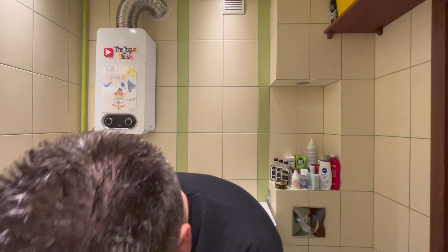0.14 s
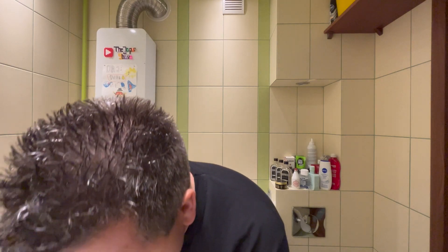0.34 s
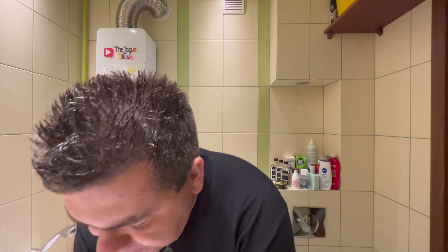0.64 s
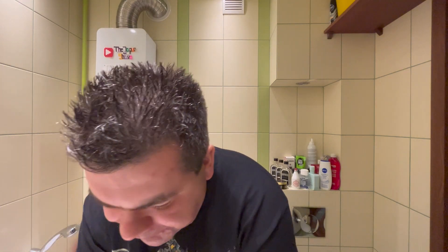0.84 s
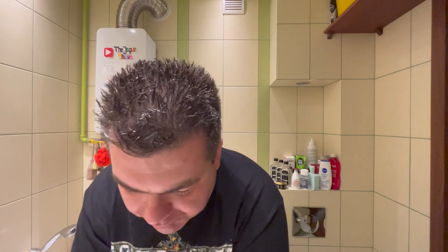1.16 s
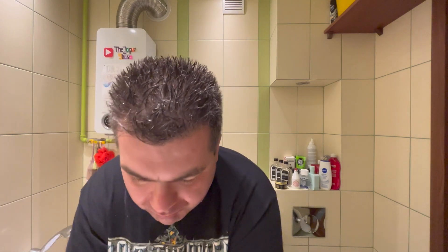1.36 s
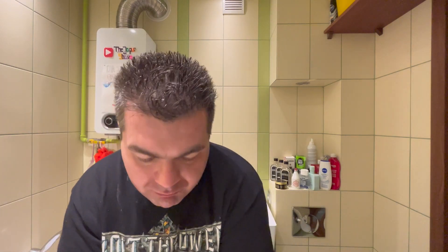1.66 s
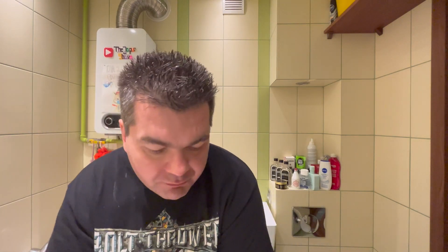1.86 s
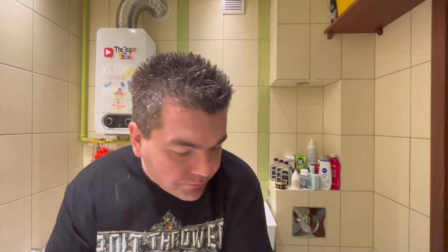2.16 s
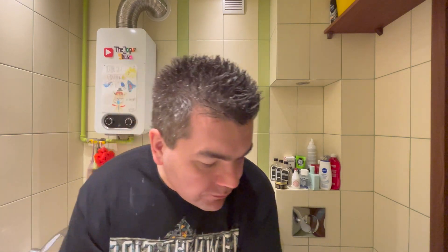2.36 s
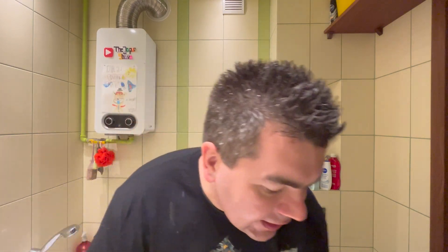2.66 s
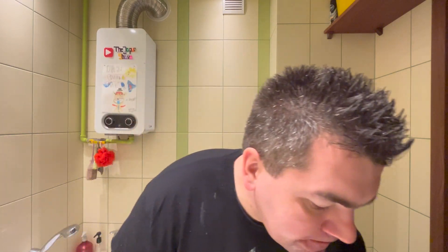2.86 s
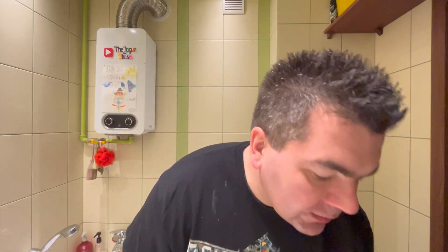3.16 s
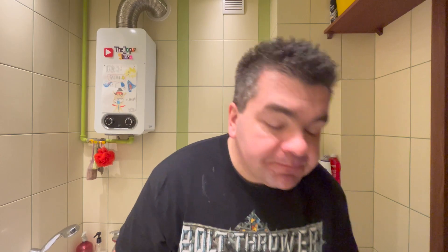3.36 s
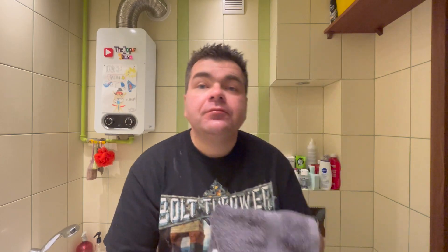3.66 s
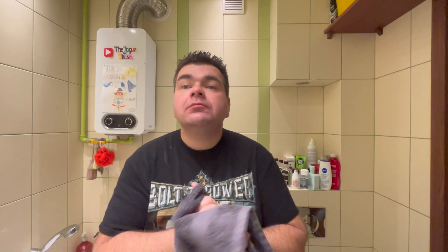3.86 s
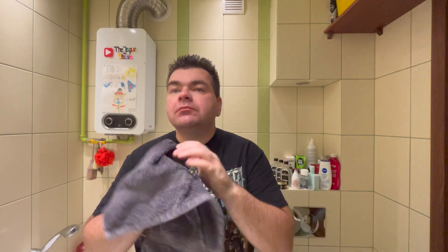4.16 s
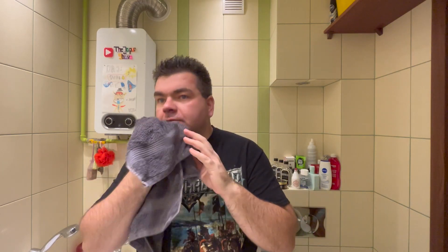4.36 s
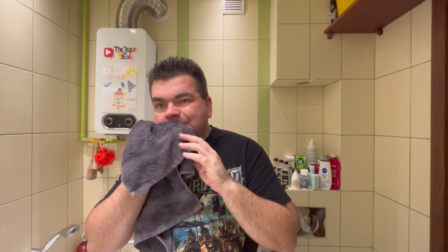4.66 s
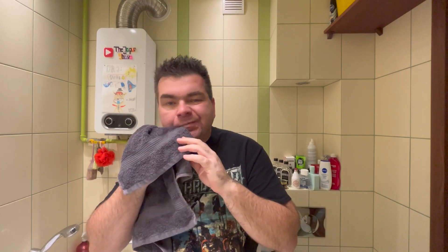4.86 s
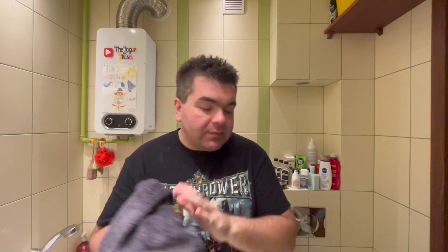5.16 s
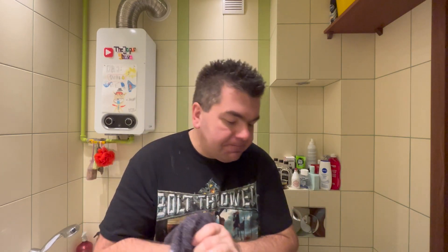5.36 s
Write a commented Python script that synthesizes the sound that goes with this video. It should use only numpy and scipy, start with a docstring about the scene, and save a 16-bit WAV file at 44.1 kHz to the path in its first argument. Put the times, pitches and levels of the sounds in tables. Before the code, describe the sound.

In a small tiled bathroom, frothy hand washing gurgles in quick strokes, eases into drips and water flicks, and ends with towel rubbing and a thump.

```python
"""Hands slosh and rinse in a basin of water in a small tiled bathroom: each hand stroke stirs clouds of
ringing bubbles and fizzing foam, gulps air and presses out bursts of froth. A few drops then click,
water is flicked off as showers of fine grains, wet fingers squeak, the drain answers with a sinking glug
and a sharp wet slap rings low. Last, a towel is picked up, rubbed as shaped noise, pulled away with a tick and
dropped with damped thuds. Changing sound paths and dense tile echoes surround it, over a quiet steady noise."""
import sys
import numpy as np
from scipy import signal
from scipy.fft import rfft, irfft
from scipy.io import wavfile
from scipy.ndimage import uniform_filter1d

SR = 44100
rng = np.random.default_rng(int(sys.argv[2]) if len(sys.argv) > 2 else 0)


def master_out(mix):
    """Clip the mix to full scale and print it as 16-bit PCM to the path in sys.argv[1]."""
    frames = np.transpose(np.atleast_2d(mix))
    ceiling = np.clip(frames, -1, 1)
    pcm = np.round(ceiling * 32767).astype(np.int16)
    wavfile.write(sys.argv[1], SR, pcm)


N = 242991
TIME = np.arange(N) / SR
# Table levels are relative: the sources and the mix apply further gains.


def from_db(db):
    """Logarithmic level: decibels to amplitude gain."""
    return 10 ** (np.asarray(db) / 20)


def rms_one(x):
    """Normalisation: scale to unit rms."""
    return x / np.sqrt(np.mean(x ** 2) + 1e-20)


def in_time(rows):
    """Linear interpolation: each column of a curve at every sample."""
    s, *columns = np.transpose(rows)
    return [np.interp(TIME, s, c) for c in columns]


def at_hz(points, hz):
    """Logarithmic frequency: read a table on a log-frequency axis."""
    f, value = np.transpose(points)
    return np.interp(np.log(np.maximum(hz, 1)), np.log(f), value)


def colour(x, spectrum):
    """Spectral shaping: weight the spectrum by a smooth curve; rms 1."""
    n = x.shape[-1]
    gain = from_db(at_hz(spectrum, np.fft.rfftfreq(n, 1 / SR)))
    return rms_one(irfft(rfft(x) * gain, n))


def resonate(x, hz, width_hz):
    """Damped resonance: a two-pole filter with gain 1 at its peak."""
    r = np.exp(-np.pi * width_hz / SR)
    zeros = np.array([1, 0, -1]) * (1 - r * r) / 2
    poles = [1, -2 * r * np.cos(2 * np.pi * hz / SR), r * r]
    return signal.lfilter(zeros, poles, x + 1e-18)


def drift(per_s):
    """Slow random modulation: interpolated chance values with spread 1."""
    knots = rng.standard_normal(2048)
    return rms_one(np.interp(TIME * per_s, np.arange(len(knots)), knots))


def grains(n, per_s, spread_db):
    """Shot noise: random clicks of uneven size and either sign."""
    luck = (1 - rng.random(n)) * SR / per_s
    at = np.flatnonzero(luck < 1)
    out = np.zeros(n)
    size_db = spread_db * np.minimum(-np.log(luck[at]), 4)
    out[at] = (-1) ** at * from_db(size_db)
    return out


def add(track, s, sound):
    """Superposition: lay a sound into a track at a time."""
    i = max(round(s * SR), 0)
    track[..., i:i + sound.shape[-1]] += sound[..., :N - i]


def panned(x, pan_db):
    """Level difference between the ears: pan at constant power, positive to the left."""
    gains = from_db(np.array([[pan_db], [-pan_db]]) / 2)
    return x * gains / np.sqrt(np.mean(gains ** 2))


def swell(attack, length):
    """Transient envelope: a quick rise and a rounded fall."""
    t = TIME[:SR // 4]
    return (1 - np.exp(-t / attack)) * np.exp(-(t / length) ** 1.7)


def gesture(t, rise, steepness):
    """Movement of the hand: speeds up to 1 after its rise time, then eases off more slowly."""
    u = np.maximum(t, 0) / rise
    return (u * np.exp(1 - u)) ** steepness


def gestures(moves, steepness):
    """Energy sum of overlapping movements (start s, rise s, dB); steeper ones stand further apart."""
    t = TIME[::SR // 1000]
    energy = sum((from_db(db) * gesture(t - s, rise, steepness)) ** 2 for s, rise, db in moves)
    return np.interp(TIME, t, np.sqrt(energy))


# spectrum of the steady background: f/Hz, level/dB
QUIET_SPECTRUM = [(30, -10), (120, -6.5), (200, -2.5), (600, -15.5), (1400, -13), (2700, -26), (6400, -19),
                  (9500, -20), (12000, -30.5), (15500, -50.5)]


def quiet_background():
    """Stationary noise: independent coloured noise in the two channels."""
    return from_db(-68) * colour(rng.standard_normal((2, N)), QUIET_SPECTRUM)


def while_moving(x, patterns, moves_per_s=6):
    """Time-varying transmission: as the hands move, one pattern of sound paths gives way to the next."""
    out, n = 0, len(patterns)
    for k, paths in enumerate(patterns):
        # the patterns take turns in a cycle, crossfading at equal power
        distance = np.abs((TIME * moves_per_s - k + n / 2) % n - n / 2)
        share = np.clip(3 - 5 * distance, 0, 1)
        out = out + signal.oaconvolve((x * np.sqrt(share))[None], paths, axes=1)[:, :N]
    return out


# reverberation time of the tiled room: f/Hz, T60/s
ROOM_T60 = [(100, 0.39), (1500, 0.39), (5000, 0.28), (9000, 0.28), (15000, 0.19)]


def tile_echoes(first=0.0028, early=1.0, early_s=0.0054):
    """Reverberation: dense reflections, strongest early, decaying band by band; mean channel energy 1."""
    t = TIME[:SR // 2]
    hz = np.fft.rfftfreq(len(t), 1 / SR)
    mid, side = rfft(rng.standard_normal((2, len(t))))
    # long waves reach both microphones together
    alike = .8 / (1 + (hz / 280) ** 2)
    noise = np.sqrt(1 + alike) * mid + np.sqrt(np.maximum(1 - alike, 0)) * side * [[1], [-1]]
    out = 0
    for k, (_, t60) in enumerate(ROOM_T60):
        share = at_hz([(f, j == k) for j, (f, _) in enumerate(ROOM_T60)], hz)
        decay = np.exp(-np.log(1000) * t / t60)
        out = out + irfft(noise * share, len(t)) * decay
    out = out * (t > first) * (1 + early * np.exp(-t / early_s))
    return out / np.sqrt(np.sum(out ** 2) / 2)


def bathroom(x, count=5):
    """Reverberant field: the changing reflections from the tiles."""
    return while_moving(x, [tile_echoes() for _ in range(count)])


def port_paths(left_lead_s, clear_hz=1400, scatter_s=0.000975):
    """Diffraction: long waves reach the ports straight, one first; short ones detour round body and bowl."""
    n = SR // 50
    hz = np.fft.rfftfreq(n, 1 / SR)
    unevenness = uniform_filter1d(rng.standard_normal((2, len(hz))), size=9)
    detour = scatter_s * np.abs(rms_one(unevenness))
    lead = np.maximum([[-left_lead_s], [left_lead_s]], 0)
    delay = lead + detour * hz ** 2 / (hz ** 2 + clear_hz ** 2)
    # phase is the group delay summed over frequency
    turns = (np.cumsum(delay, axis=1) - delay[:, :1]) * hz[1]
    return irfft(np.exp(-2j * np.pi * turns), n)


def to_ports(x, left_lead_s, count=5):
    """Direct field: changing paths to the two microphone ports."""
    return while_moving(x, [port_paths(left_lead_s) for _ in range(count)])


# rubs of shirt and towel: start t/s, time to full speed t/s, rumple level/dB, fibre hiss level/dB
RUBS = [(2.704,0.097,-56.5,-55), (2.85,0.25,-51.5,-57), (3.381,0.098,-55.5,-64.5), (3.536,0.13,-45,-50),
        (3.82,0.13,-55.5,-54), (3.983,0.074,-43,-52), (4.317,0.05,-56,-63.5), (4.515,0.11,-57.5,-55.5),
        (4.769,0.099,-52.5,-56), (5.11,0.082,-51,-62.5), (5.198,0.034,-45,-48.5), (5.3,0.11,-49,-48),
        (5.42,0.043,-40,-49.5)]
# spectrum of the folds: f/Hz, level/dB
RUMPLE_SPECTRUM = [(25, -17), (55, -0.5), (100, -2), (200, -1.5), (350, -2.5), (550, -3.5), (850, -6.5),
                   (1300, -7.5), (2100, -15), (4500, -75)]
# spectrum of the fibres: f/Hz, level/dB
FIBRE_SPECTRUM = [(300, -41), (1200, 1), (2500, 4.5), (4500, 3.5), (6400, 5), (7500, 3), (9500, 1.5),
                  (11500, -16.5), (16000, -14.5)]


def towel(rumple_db=-2, hiss_db=-3, steepness=1.8):
    """Friction noise: with each rub the folds rumple low while the fibres hiss."""
    rumple = gestures([(s, rise, db) for s, rise, db, _ in RUBS], steepness)
    hiss = gestures([(s, rise, db) for s, rise, _, db in RUBS], steepness)
    folds = colour(grains(N, per_s=1800, spread_db=2.0), RUMPLE_SPECTRUM)
    folds = folds * from_db(1.6 * drift(70))
    fibres = colour(grains(N, per_s=15000, spread_db=3.0), FIBRE_SPECTRUM)
    return from_db(rumple_db) * rumple * folds + from_db(hiss_db) * hiss * fibres


# the towel's tick: t/s, level/dB, upper band edge f/Hz
SNAP = (5.037, -30, 5600)


def snap():
    """Impulse response: one dry, broad tick as the towel is pulled away."""
    s, db, hz = SNAP
    click = np.zeros(N)
    add(click, s, np.ones(1))
    band = signal.butter(1, [hz / 10, hz], "band", fs=SR, output="sos")
    tick = signal.sosfilt(band, click + 1e-18)
    soften = signal.butter(2, 10000, fs=SR, output="sos")
    return from_db(db) * signal.sosfilt(soften, tick) / tick.max()


# soft blows of water and cloth: t/s, level/dB, f/Hz, length t/s
THUDS = [(1.68,-43.5,118,0.078), (1.768,-39.5,111,0.052), (1.986,-49,377,0.1), (4.285,-51,850,.014),
         (4.285,-46,448,.035), (5.207,-31.5,805,0.018), (5.208,-24.5,298,0.024), (5.212,-27.5,126,0.016),
         (5.214,-22.5,56,0.017)]


def thuds(level_db=-2, damping=0.39, soft_hz=1900):
    """Heavy damping: dull blows as broad resonances of noise, stripped of treble."""
    out = np.zeros(N)
    for s, db, hz, length in THUDS:
        push = resonate(rng.standard_normal(SR // 4), hz, damping * hz)
        push = resonate(push, hz, 2 * hz)
        shape = swell(0.0042, length)
        blow = rms_one(push * shape) * np.sqrt(np.mean(shape ** 2))
        add(out, s, from_db(db + level_db) * blow)
    return signal.sosfilt(signal.butter(4, soft_hz, fs=SR, output="sos"), out + 1e-18)


# the drain's hollow answer to the first flick: t/s, level/dB, f/Hz, length t/s
GLUG = (2.455, -41.5, 180, .058)


def drain(sag=.19, sag_s=.03):
    """Air-pocket oscillation: air shifts in the pipe; its pitch wobbles and sinks as it burbles away."""
    s, db, hz, length = GLUG
    t = TIME[:SR // 4]
    pitch = hz * (1 - sag * (1 - np.exp(-t / sag_s)) + .05 * drift(110)[:len(t)])
    burble = from_db(3 * drift(80)[:len(t)])
    tone = np.sin(2 * np.pi * np.cumsum(pitch) / SR)
    out = np.zeros(N)
    add(out, s, from_db(db) * tone * swell(0.025, length) * burble)
    return out


# wet fingers squeaking around the first flick: t/s, f/Hz, level/dB
SQUEAK = [(2.398, 4300, -72), (2.455, 4220, -43), (2.51, 3950, -46), (2.59, 3640, -62)]


def wet_skin(level_db=0, slips_per_s=2500, width_hz=280):
    """Stick-slip: wet fingers slide in uneven slips, a hoarse squeak that falls in pitch."""
    hz, db = in_time(SQUEAK)
    sliding = (TIME > SQUEAK[0][0]) & (TIME < SQUEAK[-1][0])
    # a resonance that follows the pitch: shift it to zero, smooth, shift back
    turn = np.exp(2j * np.pi * np.cumsum(hz) / SR)
    slips = grains(N, slips_per_s, spread_db=3.0)
    ringing = signal.lfilter([1], [1, -np.exp(-np.pi * width_hz / SR)], slips / turn)
    squeak = np.real(turn * ringing)
    return from_db(db + level_db) * sliding * rms_one(np.gradient(squeak))


# spectrum of the tiny bursting cells: f/Hz, level/dB
SPRAY_SPECTRUM = [(60, -41), (300, -14), (900, 0.5), (2000, 3), (4000, 0), (6500, 3), (9000, -0.5),
                  (11000, -4.5), (13000, -32.5), (15000, -6)]


def burst(hz, length, focus, width_hz, attack):
    """Shot noise with a resonance: a cloud of tiny bursting cells, brightest at the commonest cell size."""
    cells = colour(grains(SR // 4, per_s=17000, spread_db=2.0), SPRAY_SPECTRUM)
    commonest = rms_one(resonate(cells, hz, width_hz))
    return rms_one(cells + focus * commonest) * swell(attack, length)


def bubble(hz, t60, rise):
    """Bubble resonance: a decaying tone whose pitch glides by the share `rise` over its ring time."""
    t = TIME[:SR // 4]
    age = np.minimum(t / t60, 1)
    tone = np.sin(2 * np.pi * np.cumsum(hz * (1 + rise * age)) / SR)
    decay = np.exp(-np.log(1000) * (t / t60) ** 0.98)
    onset = 1 - np.exp(-t * hz)
    return tone * decay * onset


# drops and small clicks: t/s, level/dB, f/Hz, ring T60/s, glide as a share of the pitch
DROPS = [(2.109,-38,5160,0.023,0), (2.189,-34,4800,0.037,0), (2.299,-37,4830,0.034,-.1),
         (2.602,-35,3545,.05,0.14), (2.621,-36.5,5830,0.027,-0.43), (2.665,-34,6700,.0088,0),
         (2.695,-16,6850,0.0072,-0.072), (2.741,-16.5,4530,0.0039,-0.073)]


def drops(level_db=0, tick=0.24, ring=0.34):
    """Impact and entrainment: a drop lands with a tick and traps a tiny bubble that rings or chirps."""
    out = np.zeros(N)
    for s, db, hz, t60, glide in DROPS:
        # a brief tick is also a broad one
        splash = burst(hz, t60 / 4, focus=4.7, width_hz=12 / t60, attack=0.0001)
        trapped = bubble(hz, t60, rise=glide)
        add(out, s, from_db(db + level_db) * (tick * splash + ring * trapped))
    return out


# water flicked off the hands: t/s, level/dB, brightest f/Hz, length t/s, strength of that pitch over the spray
FLICKS = [(2.358,-51.5,8000,0.29,0.94), (2.441,-29.5,13200,.04,1.8), (2.442,-30.5,8500,0.039,1.6),
          (3.081,-23.5,6650,0.028,8.4), (3.109,-30,4630,0.029,2.5), (3.115,-30.5,1370,0.027,1.5),
          (3.107,-35,13600,0.024,2.6)]


def flicks(level_db=-3):
    """Superposed impacts: showers of fine droplets hit the tiles."""
    out = np.zeros(N)
    for s, db, hz, length, focus in FLICKS:
        shower = burst(hz, length, focus=focus, width_hz=1200, attack=0.001)
        add(out, s, from_db(db + level_db) * shower)
    return out


# froth pressed out between the hands: t/s, level/dB, brightest f/Hz, length t/s
SQUIRTS = [(0.226,-17,8400,0.0063), (0.363,-22,3300,0.018), (0.557,-25.5,2380,0.01),
           (0.643,-18,4260,0.0071), (0.757,-14,4000,0.0086), (0.836,-15.5,3280,0.0071),
           (0.949,-18,6300,0.004), (1.028,-26.5,2210,0.044), (1.158,-15,7700,0.0057),
           (1.368,-21,3380,0.0072), (1.494,-30.5,6400,0.021), (1.678,-10,6740,0.0049)]


def squirts(level_db=-2):
    """Collective bursting: froth is pressed out between the hands."""
    out = np.zeros(N)
    for s, db, hz, length in SQUIRTS:
        froth = burst(hz, length, focus=1.0, width_hz=1800, attack=0.004)
        add(out, s, from_db(db + level_db) * froth)
    return out


# large air pockets as water closes around the hands, and last the low ring of a sharp wet slap:
# t/s, level/dB, f/Hz, ring T60/s
GULPS = [(.088,-33,1300,.03), (.102,-24,1268,0.062), (.165,-12,1660,0.022), (.18,-18,1495,0.093),
         (.228,-7.5,1680,0.0091), (.316,-29,636,0.1), (.385,-12,1013,0.024), (.386,-18,570,.03),
         (.423,-21,870,0.0092), (.443,-19,612,0.036), (.521,-17,1470,0.013), (.556,-18.5,2323,0.046),
         (.557,-13.5,1050,0.019), (.646,-16,1120,0.019), (.718,-14,1648,0.08), (.722,-15,512,0.024),
         (.74,-14.5,1082,0.032), (.755,-10.5,467,0.017), (.843,-11.5,1054,0.016), (.844,-16.5,550,.02),
         (.858,-16,1670,0.02), (.930,-11,1070,.009), (.951,-5,1050,0.0087), (1.024,-10.5,1800,0.014),
         (1.03,-16,1130,0.033), (1.122,-14,1414,0.028), (1.134,-13,1040,0.032), (1.158,-11,1260,0.024),
         (1.261,-18,1498,0.038), (1.344,-14.5,997,0.012), (1.368,-14,1636,0.013), (1.647,-15.5,574,0.014),
         (1.658,-13.5,493,0.017), (1.678,-10,633,0.012), (1.784,-26.5,1464,.034), (3.117,-15,370,0.03),
         (3.117,-20,1150,0.016)]


def gulps(level_db=-1, small_db=-15, scatter=0.3, lag=0.0075, lowest_hz=400, count=7):
    """Resonance of trapped air: each large ring comes with a few smaller and larger bubbles."""
    out = np.zeros(N)
    for s, db, hz, t60 in GULPS:
        add(out, s, from_db(db + level_db) * bubble(hz, t60, rise=0.077))
        for size, delay, sign in np.clip(rng.standard_normal((count, 3)), -1.5, 1.5):
            shed = bubble(hz * np.exp(scatter * size), 0.87 * t60, rise=0.017)
            add(out, s + lag * abs(delay), from_db(db + small_db) * np.sign(sign) * shed)
    # the bubbles are stripped of their bass
    return signal.sosfilt(signal.butter(2, lowest_hz, "high", fs=SR, output="sos"), out + 1e-18)


# hand strokes, about ten a second, then slower and lighter:
# start t/s, time to full push t/s, slosh level/dB, fizz level/dB
STROKES = [(-.05,0.046,-41,-39), (0.108,0.05,-25,-29), (0.21,0.039,-23,-24), (.278,0.044,-26,-31),
           (.374,0.057,-27,-29), (0.516,0.04,-29,-32.5), (.603,0.046,-27.5,-27), (.712,0.037,-25.5,-29.5),
           (.807,0.034,-28,-21.5), (0.943,0.015,-20.5,-18), (1.006,0.027,-25.5,-29.5),
           (1.106,0.025,-23,-27), (1.15,.03,-30.5,-27), (1.227,0.03,-27,-29), (1.331,0.043,-28,-32),
           (1.459,0.043,-43,-40), (1.575,0.043,-40.5,-52), (1.625,0.039,-28.5,-37.5),
           (1.712,0.054,-28,-40.5), (1.934,0.088,-45,-53)]
# how deep the hands dig: t/s, lowest bubble f/Hz
DEPTH = [(.22, 1150), (.38, 500), (.7, 520), (.73, 390), (1.5, 288), (1.66, 260), (2.0, 130)]
# spectrum of the bubble clumps: f/Hz, level/dB
SLOSH_SPECTRUM = [(160, -15), (300, -1), (550, 0.5), (760, -4.5), (1000, -2), (1250, 1), (1600, -1),
                  (2100, 1), (2600, -16)]
# spectrum of the foam: f/Hz, level/dB
FIZZ_SPECTRUM = [(300, -28.5), (1200, -4), (2300, 2), (3500, 6.5), (5000, -1), (6300, 2.5), (7200, -0.5),
                 (9000, -0.5), (10500, -9), (12500, -27.5), (16000, -6.5)]
# spectrum of the heaving water: f/Hz, level/dB
WAVE_SPECTRUM = [(25, -11), (60, 0), (120, 2), (250, 0.5), (500, -14.5), (1500, -58.5)]


def lather(slosh_db=-6, fizz_db=-6, heave_db=-23, heave_hz=380, sharpness=16, cell_sharpness=16, count=24):
    """Bubble-size resonance: strokes stir clumps and foam; deeper ones free larger bubbles and heave water."""
    pushes = [(s, rise, db) for s, rise, db, _ in STROKES]
    slosh = gestures(pushes, 3.5)
    # less steep: the water goes on rocking between strokes, and the foam lingers
    rocking = gestures(pushes, 0.77)
    fizz = gestures([(s, 0.98 * rise, db) for s, rise, _, db in STROKES], 1.34)
    lowest_hz, = in_time(DEPTH)
    clumps = from_db(2.5 * drift(170))
    cloud, foam = np.zeros(N), np.zeros(N)
    for hz in np.geomspace(160, 2400, count):
        stirred = clumps * grains(N, per_s=160, spread_db=4.5)
        rings = rms_one(resonate(stirred, hz, hz / sharpness))
        freed = 1 / np.sqrt(1 + (lowest_hz / hz) ** 8)
        cloud += rings * np.sqrt(hz) * from_db(at_hz(SLOSH_SPECTRUM, hz)) * freed
    for hz in np.geomspace(2200, 14000, count):   # foam cells of one size ring alike
        cells = clumps * grains(N, per_s=170, spread_db=3.5)
        foam += np.sqrt(hz) * rms_one(resonate(cells, hz, hz / cell_sharpness))
    heave = colour(rng.standard_normal(N), WAVE_SPECTRUM) / (1 + (lowest_hz / heave_hz) ** 3)
    stirring = from_db(slosh_db) * slosh * rms_one(cloud)
    fizzing = from_db(fizz_db) * fizz * colour(foam, FIZZ_SPECTRUM)
    return stirring + fizzing + from_db(heave_db) * rocking * heave


# resonances of the basin: f/Hz, width f/Hz, level/dB
BASIN_MODES = [(581, 50, -6.5), (960, 25, 3), (1150, 36, -4.5), (1427, 128, -6.5), (1595, 410, -6.5),
               (2004, 110, -7)]


def basin(x):
    """Modal resonance: the bowl rings along with the water."""
    return x + sum(from_db(db) * resonate(x, hz, width) for hz, width, db in BASIN_MODES)


def scene(water_db=-3, froth_db=1.0, flick_db=0, drop_db=-2.0, cloth_db=-2.0):
    """Precedence: basin and towel arrive first at the left, flicks and drops at the right; the room joins."""
    water, froth = basin(gulps() + lather()), squirts()
    shaken, clicks = flicks() + wet_skin(), drops()
    cloth, tick = towel() + thuds(), snap()

    at_basin = from_db(water_db) * water + from_db(froth_db) * froth + drain()
    at_hands = from_db(flick_db) * shaken + from_db(drop_db) * clicks
    at_towel = from_db(cloth_db) * cloth + tick
    direct = to_ports(at_basin, left_lead_s=0.00016)
    direct = direct + panned(to_ports(at_hands, left_lead_s=-0.000316), pan_db=-4)
    direct = direct + to_ports(at_towel, left_lead_s=0.0002326)

    # each source excites the room at its own level
    sent = from_db(-7.0) * water + from_db(1.5) * froth + from_db(-3.5) * shaken
    sent = sent + clicks + from_db(-5.0) * cloth + from_db(7.5) * tick
    return direct + bathroom(sent) + quiet_background()


# colour of the left port against the right: f/Hz, left minus right level/dB
PORT_TILT = [(100, -3), (600, -1), (1300, -4.5), (2800, -4), (5000, -12), (9000, -2.5), (14000, 2)]


def record(dry, cutoff_hz=16200):
    """Transducer response: each port has its own colour; the top is cut steeply."""
    tilt_db = at_hz(PORT_TILT, np.fft.rfftfreq(N, 1 / SR))
    heard = irfft(rfft(dry) * from_db(tilt_db * np.array([[.5], [-.5]])), N)
    return signal.sosfilt(signal.ellip(10, .3, 80, cutoff_hz, fs=SR, output="sos"), heard)


dry = scene()
out = record(dry)
master_out(out)
```